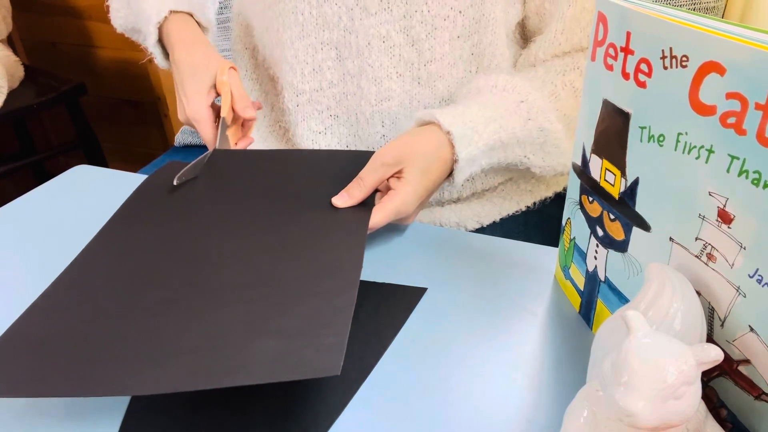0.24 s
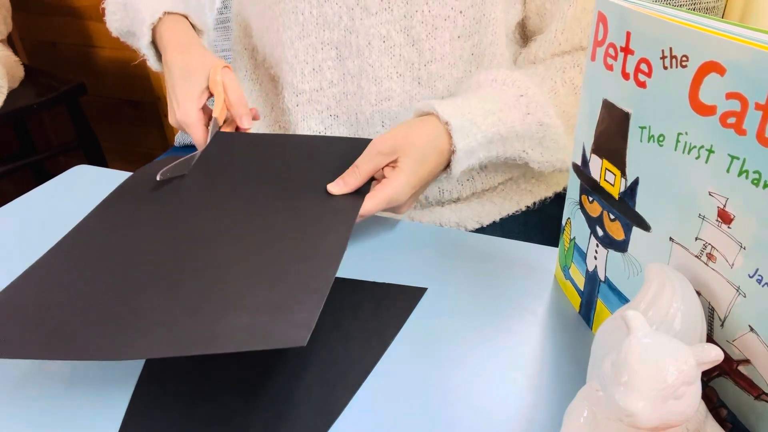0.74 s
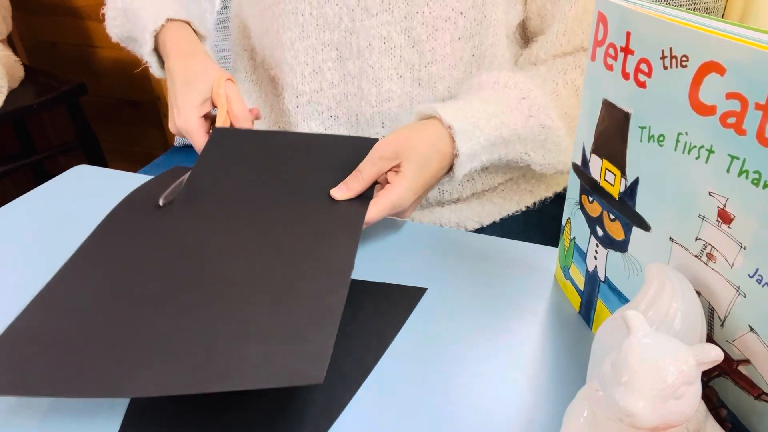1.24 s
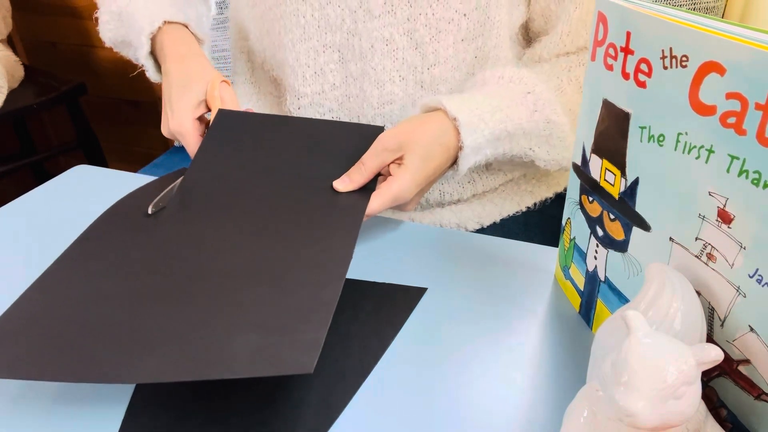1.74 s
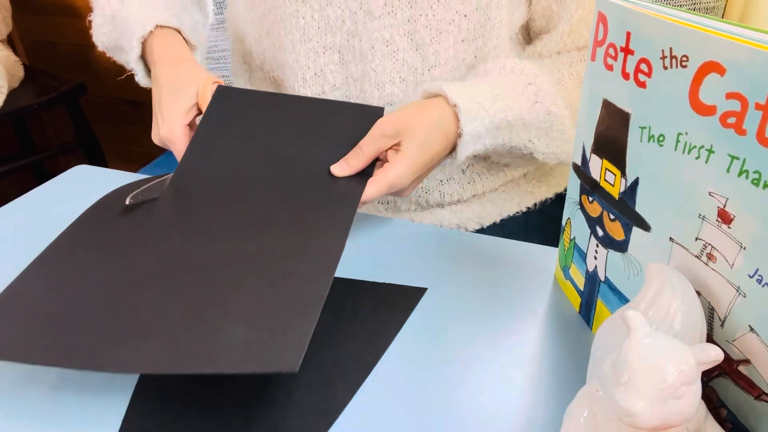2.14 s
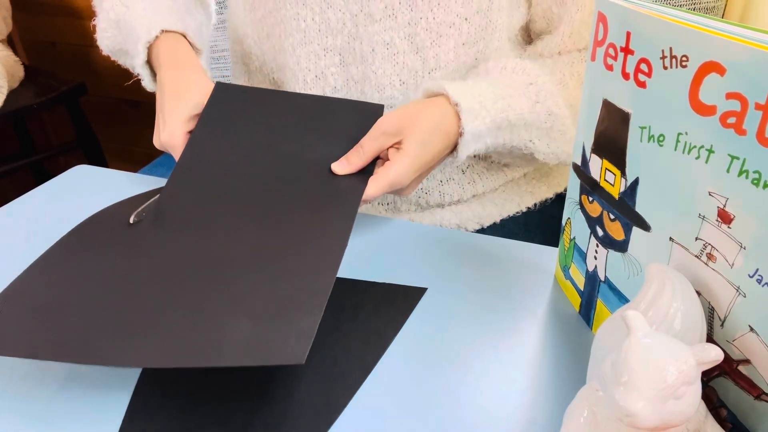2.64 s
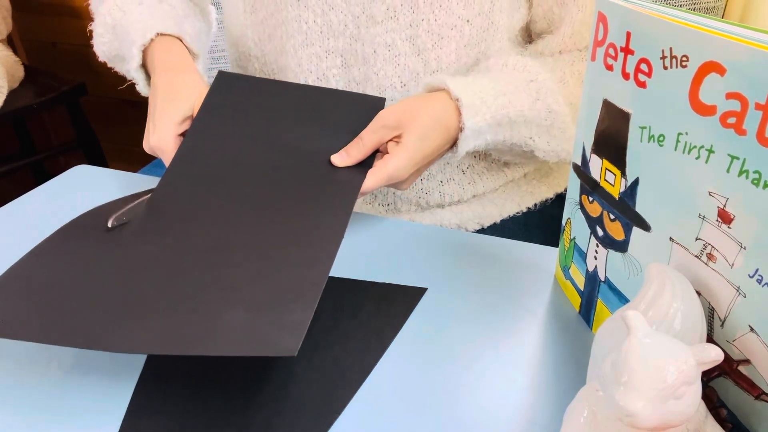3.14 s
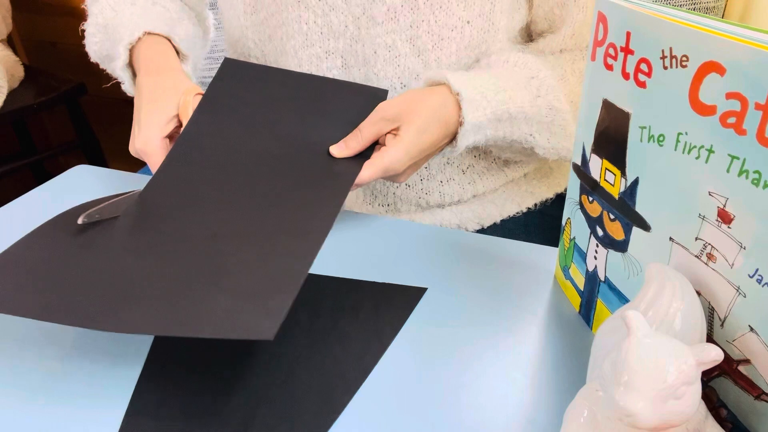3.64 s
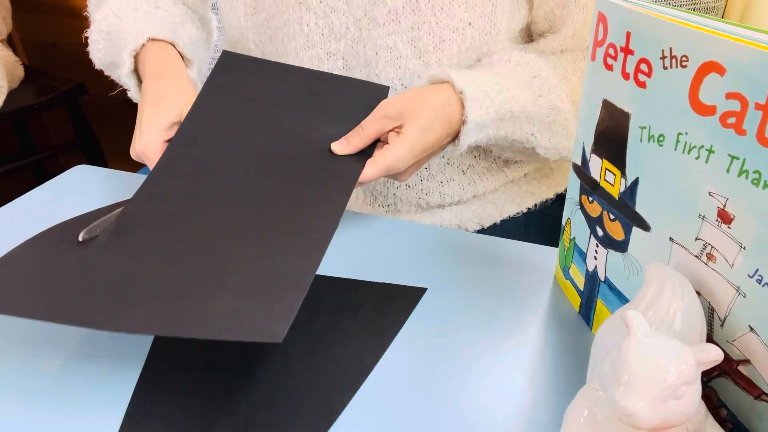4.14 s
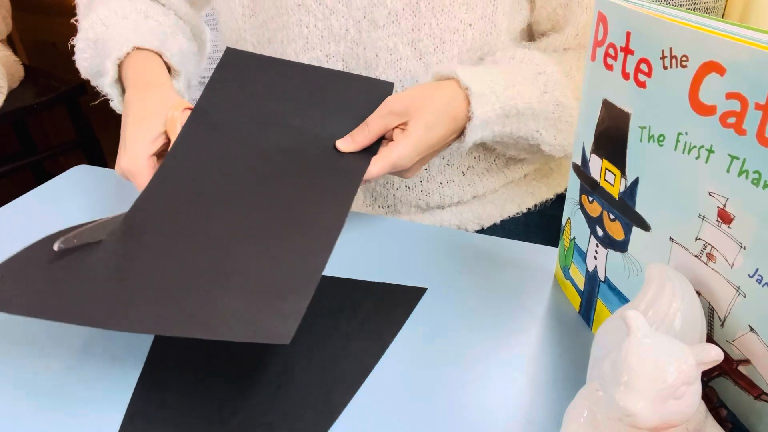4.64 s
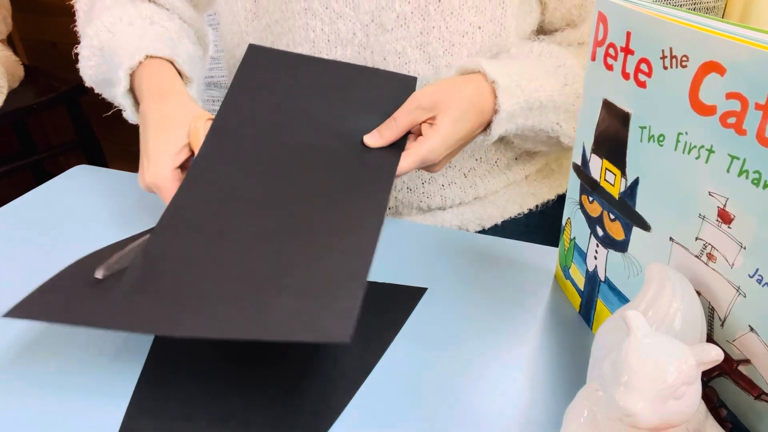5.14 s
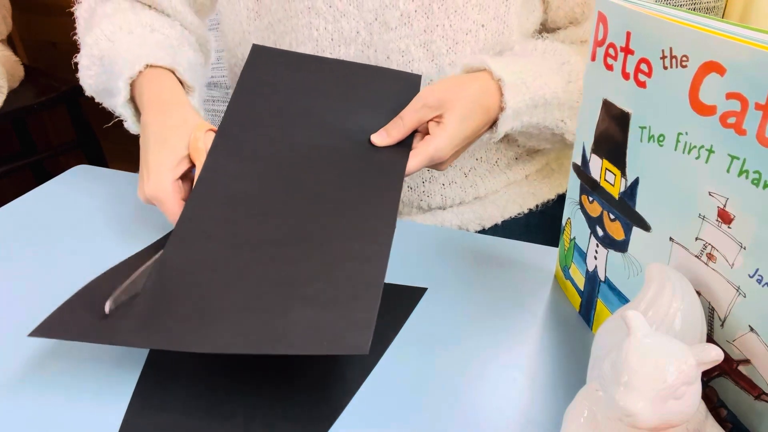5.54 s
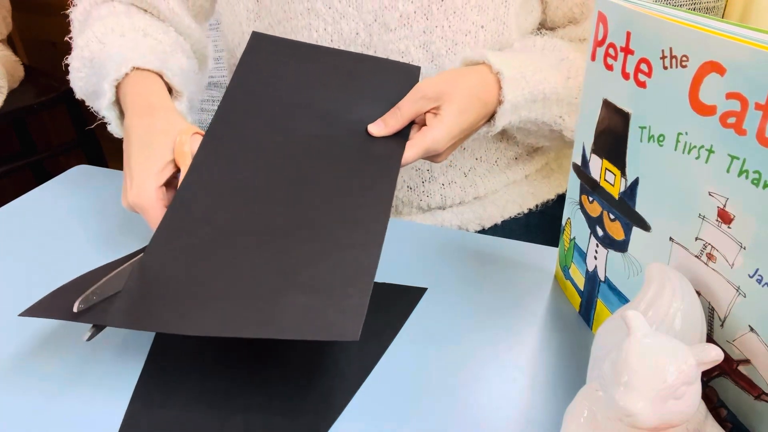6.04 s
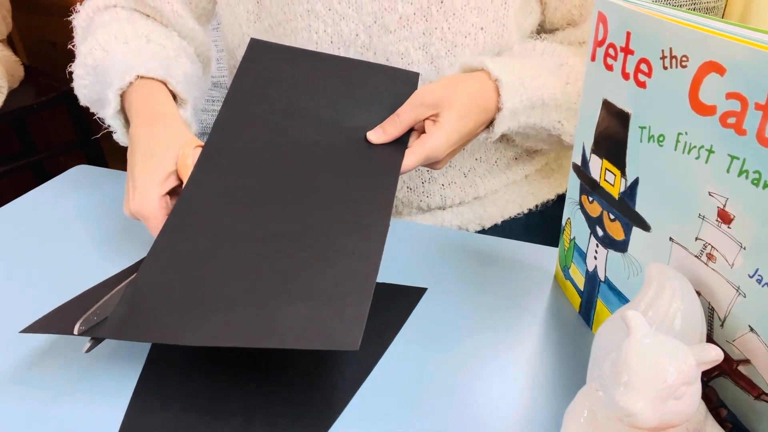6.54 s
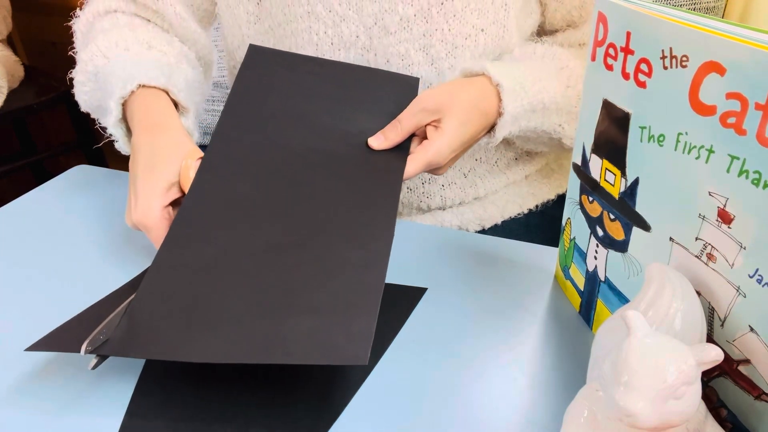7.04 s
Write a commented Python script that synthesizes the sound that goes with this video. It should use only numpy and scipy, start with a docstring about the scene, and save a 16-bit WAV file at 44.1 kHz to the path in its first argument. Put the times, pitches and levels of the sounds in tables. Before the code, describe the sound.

Close stereo microphones in a small quiet room catch scissors cutting stiff paper. Crunchy, crackling closing strokes come about every seven tenths of a second, each followed by a hissing, scraping slide as the blades reopen. The loose sheet rings and flexes softly, with a few tiny squeaks. Later bites are more hesitant, and a bright metallic snap ends the cut over low ventilation rumble.

```python
"""In a small quiet room, scissors cut a strip off a sheet of stiff craft paper held above a table.
Closing strokes tear fibres in runs of bites: grain bursts that crackle, crunch and ring the sheet; some squeak.
Openings rub the blades along the cut, as filtered slips; a sleeve brushes the sheet now and then.
At the end the blades break through the edge and snap shut with a sweep, a bounce and ringing modes.
Ventilation (shaped noise and hum) and a far engine's sinking drone (two sines) lie underneath."""
import sys
import numpy as np
from scipy import signal
from scipy.fft import rfft, irfft, next_fast_len
from scipy.io import wavfile

SR = 44100
rng = np.random.default_rng(int(sys.argv[2]) if len(sys.argv) > 2 else 0)


def pcm_store(signal):
    """Save signal as 16-bit PCM."""
    levels = np.round(np.clip(np.atleast_2d(signal), -1, 1) * 32767)
    wavfile.write(sys.argv[1], SR, levels.astype(np.int16).T)


N = 322371
T = np.arange(N) / SR
PADDED = next_fast_len(N + SR // 10)
BINS_HZ = np.fft.rfftfreq(PADDED, 1 / SR)

# Levels in the tables are in dB; most layers add a trim of their own.
# ventilation rumble: f/Hz, level/dB
AIR_SPECTRUM = [(20, -45), (35, -7.5), (50, 0), (95, 6.5), (130, -0.5), (190, -1), (260, -10.5),
                (330, -17.5), (430, -29), (800, -41), (1500, -44.5), (3000, -41), (6000, -50.5),
                (12000, -54), (16000, -79.5)]
# extra level of the rumble that differs left and right: f/Hz, level/dB
AIR_APART = [(50, -1.5), (150, 5.0), (300, 17.5), (1000, 26.0), (16000, 14.5)]
# ventilation hum: f/Hz, level/dB, waver/dB
HUM_TONES = [(48.6, -71.5, 3.5), (119.1, -69.5, 1.5), (241.3, -64.5, 0.15)]
# far engine, slowly sinking in pitch: t/s, f/Hz, fundamental level/dB, octave level/dB
ENGINE_DRONE = [(0.0, 101, -70, -76), (0.4, 100.5, -75, -55), (0.9, 100, -78, -87), (1.55, 99, -52, -73.5),
                (2.0, 96.5, -64, -68), (2.4, 95, -56, -68), (2.9, 93.5, -59, -60), (3.45, 91.5, -61, -66.5),
                (4.2, 89, -74, -60), (5.0, 85.5, -62.5, -66.5), (7.3, 81, -68, -66.5)]

# bites of the blades: t/s, tearing time/s, sheet level/dB, sheet f/Hz, crunch level/dB, crackle level/dB
FIBRE_BITES = [(0.0345, 0.0025, -55, 1265, -56, -94), (0.152, 0.0047, -49, 1190, -46, -66),
               (0.1638, 0.0055, -52.5, 910, -58, -55), (0.211, 0.0035, -61, 1000.0, -57, -58),
               (0.2287, 0.003, -45, 1190.0, -48, -55), (0.2545, 0.0044, -47, 775, -44, -63),
               (0.2738, 0.0031, -44, 740, -43.5, -60), (0.3016, 0.0039, -45.5, 775, -47.5, -54),
               (0.3328, 0.0034, -39, 765, -42.5, -57), (0.3601, 0.0055, -45, 690.0, -49, -58.0),
               (0.3875, 0.0048, -39.5, 800, -41, -69), (0.5567, 0.002, -40.5, 1160, -43, -46.5),
               (0.658, 0.0015, -45, 1190, -45.5, -75), (0.8973, 0.0044, -55, 710, -55, -59),
               (0.9344, 0.0043, -40, 1230, -42.5, -58), (0.9567, 0.0066, -37.5, 1190, -47, -59),
               (0.9825, 0.0044, -42, 780, -43.5, -53), (1.016, 0.0054, -41, 1000.0, -45.5, -64),
               (1.0487, 0.003, -37, 935, -39.5, -60), (1.2867, 0.0011, -44, 1160, -46.5, -48),
               (1.5707, 0.0037, -46, 920, -57, -55), (1.5885, 0.0052, -39.5, 1180, -48, -51.5),
               (1.62, 0.0037, -39, 890, -50, -52), (1.6417, 0.0038, -39.5, 755, -49, -50.5),
               (1.6541, 0.0036, -45, 700.0, -54, -51.5), (1.6709, 0.004, -38, 726, -47.5, -66),
               (1.699, 0.0036, -40, 846, -43.5, -63), (1.7122, 0.0041, -42.5, 700, -54, -55.5),
               (1.7592, 0.0032, -33.5, 906, -40.5, -51), (1.8244, 0.0047, -42, 730, -50.5, -63),
               (2.2841, 0.0045, -48.5, 1180, -60, -66), (2.294, 0.0052, -41.5, 1170, -48, -54),
               (2.3135, 0.0024, -39, 786, -52, -59.0), (2.3325, 0.0034, -39, 1210, -46, -54),
               (2.3497, 0.0036, -39.5, 816, -50, -63), (2.3655, 0.004, -41, 805, -46, -57.5),
               (2.3968, 0.003, -37, 890, -49, -59), (2.405, 0.0032, -38, 910, -45, -61),
               (2.4249, 0.0055, -38.5, 930.0, -50, -63.5), (2.435, 0.0037, -41.5, 920.0, -54.5, -64),
               (2.4549, 0.0039, -37.5, 1200, -44, -55), (2.4849, 0.0035, -37.5, 780, -45.5, -64),
               (2.6005, 0.0028, -54.5, 690, -49, -61), (2.6614, 0.0057, -45.5, 1030, -60.5, -75),
               (2.699, 0.003, -43.5, 1000, -42, -52), (2.843, 0.003, -55, 1200, -54.5, -67),
               (2.8722, 0.0042, -53.5, 1190, -48.5, -56.5), (2.9006, 0.0048, -52.5, 720, -49.5, -70.5),
               (2.991, 0.0025, -52.5, 786, -57, -64.5), (3.0375, 0.004, -38.0, 770.0, -42.5, -49),
               (3.0598, 0.0034, -39, 1040, -44.5, -56), (3.1285, 0.004, -36.5, 780.0, -41.5, -52),
               (3.16, 0.003, -43.5, 810, -43, -54), (3.243, 0.002, -46, 910, -49, -59),
               (3.2598, 0.004, -36.5, 727, -37.5, -50), (3.2818, 0.0036, -40.5, 704, -47, -59),
               (3.3041, 0.0039, -43.5, 760, -47, -56), (3.636, 0.0038, -38, 675, -51.5, -69),
               (3.7392, 0.0042, -48.5, 860, -58.5, -96), (3.8408, 0.0058, -50.5, 780, -54.5, -60.5),
               (3.9143, 0.0049, -48.5, 790, -55, -58.5), (3.9884, 0.0046, -39.5, 746, -46, -50),
               (4.0124, 0.0045, -47.5, 790, -54.5, -55), (4.0599, 0.0044, -37, 705, -39.5, -48.5),
               (4.1056, 0.0029, -40, 815, -40, -46.5), (4.1379, 0.0033, -47.5, 790.0, -41.5, -58),
               (4.171, 0.0029, -54, 770, -50.5, -61), (4.374, 0.0011, -37, 1210, -52, -46),
               (4.438, 0.0058, -45, 557, -54.5, -48.5), (4.4887, 0.0014, -39, 580, -45, -55),
               (4.775, 0.0052, -41.5, 790, -38.5, -42.5), (4.7942, 0.0034, -38, 754, -40, -51),
               (4.8125, 0.0035, -48, 740, -45.5, -55.5), (4.8428, 0.0028, -42, 960, -44, -51),
               (4.8768, 0.0036, -44, 780, -46.5, -52), (4.9234, 0.0038, -43, 754, -42.5, -53),
               (5.2141, 0.0038, -44, 1010, -46.5, -55), (5.5093, 0.0027, -48.5, 710.0, -43.5, -53),
               (5.5352, 0.0046, -44, 760.0, -39, -46.5), (5.5557, 0.0029, -51, 710.0, -46.5, -55),
               (5.5806, 0.0052, -48, 704, -46, -52), (5.639, 0.0039, -45, 610, -43, -54.0),
               (5.6612, 0.0034, -46, 1360, -54.5, -64), (6.2223, 0.0062, -54, 1180.0, -54.5, -52),
               (6.2706, 0.0025, -62, 610.0, -57.5, -62), (6.3233, 0.0038, -43, 625, -47, -50.5),
               (6.4005, 0.0042, -45, 550, -48.5, -60), (6.49, 0.0043, -51.5, 780, -48, -53.5),
               (6.6244, 0.0039, -49, 910, -55, -58.5), (6.6594, 0.004, -51, 746, -51.5, -61),
               (6.7388, 0.0044, -55.5, 870, -73.5, -82.0), (7.2008, 0.0042, -52, 780.0, -47.5, -53),
               (7.228, 0.0032, -48, 815, -48, -50), (7.2493, 0.0035, -51, 1310.0, -40.5, -46)]
# crunch of the paper, moving in pitch as the cut travels across the sheet: t/s, f/Hz
CRUNCH_PATH = [(0.3, 2040), (1.0, 1830), (1.7, 2900), (2.4, 2660), (3.1, 2170), (4.1, 1840), (4.8, 1940),
               (5.6, 1650), (6.5, 1700)]
# body of the sheet: f/Hz, level/dB
SHEET_SPECTRUM = [(80, -12.5), (180, -10.5), (300, -6.5), (410, -16.5), (600, -2.5), (800, 2), (1250, 2),
                  (1600, -2.5), (2400, -17.5), (8000, -44)]
# crunch of the paper: f/Hz, level/dB
CRUNCH_SPECTRUM = [(500, -23.5), (1100, -6.5), (1450, 5), (1900, 7.5), (2400, -3), (3100, -3.5),
                   (4300, -5.5), (6000, -7), (8000, -19), (16000, -65)]
# crackle of the fibres: f/Hz, level/dB
CRACKLE_SPECTRUM = [(1000, -15), (2500, -0.5), (4000, 4), (6000, 6.5), (7500, -1.5), (10000, -4),
                    (11700, -4), (14500, 7), (16000, 3.5)]
# resonances of the bright tick where the blades cross: f/Hz, width/Hz, level/dB
TICK_MODES = [(2576, 270, 4.5), (3580, 620, -1), (4530, 440, -1), (5830, 380, -2)]
TICK_SHADE_DB_PER_S = 1.83  # the sheet hides the blades more and more as the cut advances
# closing strokes: start t/s, end t/s, shearing level between the bites/dB
CLOSING_STROKES = [(0.133, 0.41, -55), (0.858, 1.077, -54), (1.548, 1.841, -51), (2.273, 2.477, -49),
                   (3.02, 3.338, -51.5), (3.826, 3.938, -56), (3.977, 4.185, -49), (4.736, 4.904, -44),
                   (5.5, 5.678, -49.5), (6.196, 6.413, -59.5), (6.615, 6.762, -57.5), (7.188, 7.253, -50)]

# blades open and slide on along the cut:
# start t/s, push length/s, steel fade/(dB per s), steel hiss level/dB, paper scrape level/dB
OPENING_SLIDES = [(0.526, 0.14, 482, -42, -42), (1.216, 0.098, 228, -43, -39.5),
                  (1.936, 0.13, 308, -44.5, -39), (2.642, 0.049, 81, -42, -36.5),
                  (3.43, 0.14, 151, -46, -38), (4.321, 0.092, 106, -44.5, -41),
                  (5.077, 0.11, 188, -46.5, -43.5), (5.807, 0.11, 160, -45, -47)]
SLIDE_ATTACK_S, SLIDE_SAG_DB_PER_S = 0.03, 44.5
SCRAPE_FADE_SHARE = 0.68  # the paper dies away more slowly than the steel
# steel hiss: f/Hz, level/dB
HISS_SPECTRUM = [(800, -8), (1800, -1), (2800, 4), (3600, 7.5), (4700, 4), (6000, 0), (9000, -6),
                 (11700, -9), (13300, -7.5), (16000, -9)]
# paper scrape: f/Hz, level/dB
SCRAPE_SPECTRUM = [(200, -11), (400, -21.5), (600, -5.5), (720, 0.5), (1250, 1.5), (1900, 1.5),
                   (3000, -4.5), (6000, -17), (16000, -53.5)]
# ring of the free blades: f/Hz, level/dB, t60/s
BLADE_MODES = [(2570, 9, 0.03), (4480, -7, 0.03), (7200, 2, 0.019), (8680, -3, 0.11), (9900, 1, 0.1),
               (10100, -14, 0.062), (10300, -7, 0.031), (13400, -21, .05)]

# soft thumps of the flexing sheet: t/s, f/Hz, level/dB
SHEET_FLEXES = [(0.94, 170, -58.5), (1.019, 125, -53.5), (1.58, 122, -56), (4.41, 137, -62),
                (7.267, 97, -53), (7.267, 190, -52.5)]
# the cut edge sticks and slips on the blade: start t/s, end t/s, f at the middle/Hz, level/dB
EDGE_SQUEAKS = [(0.987, 1.008, 780, -46.5), (3.125, 3.146, 803, -35), (4.08, 4.097, 770.4, -41.5),
                (4.845, 4.866, 938, -44), (5.538, 5.576, 686, -41), (5.582, 5.597, 660, -43),
                (5.646, 5.659, 640, -44.5)]
SQUEAK_SAG_HZ_PER_S = 990
# sleeve brushing the sheet: start t/s, end t/s, level/dB
SLEEVE_BRUSHES = [(4.5, 4.777, -68.5), (5.204, 5.404, -72.5), (7.08, 7.15, -79)]
# wool on paper: f/Hz, level/dB
WOOL_SPECTRUM = [(500, 10), (2000, 0.5), (3300, -1), (4600, 8), (5700, 6.5), (8000, -18), (15000, -18.5)]

SNAP_S = 7.2684
# blades hitting their stop: f/Hz, level/dB
STEEL_SPECTRUM = [(500, -18), (2500, -4), (4500, 0), (5600, -3), (7200, 3), (8000, -6), (9700, 5.5),
                  (11500, -1), (13000, 4), (16000, 2)]
# thud of the snap: f/Hz, level/dB
THUD_SPECTRUM = [(40, 2), (90, 11), (170, -4), (330, -2), (450, -4), (650, 5), (1000, 4), (1600, -4),
                 (3000, -11.5), (8000, -40)]

# resonances of the space around the table: f/Hz, width/Hz, left level/dB, right level/dB
NOOK_MODES = [(557, 23, 2.5, 11), (719, 32, 2.5, 3), (776, 20.7, -10, 14), (838, 5.7, -14, -28),
              (914, 8.4, 12, 1.5), (1027, 14.6, 10, -17), (1214, 20, 8.5, 6.5), (1390, 30, -3, -9)]
# scatter off sheet and table: f/Hz, level/dB
SCATTER_SPECTRUM = [(500, -18), (1300, -10), (2600, 0), (6000, 1), (9000, -16), (16000, -20)]
# diffuse tail: f/Hz, level/dB
WALL_SPECTRUM = [(400, 5.5), (600, 9), (1200, 0), (2800, 1.5), (6000, -3.5), (9000, -2.0), (16000, -49.5)]
# treble tail: f/Hz, level/dB
TREBLE_SPECTRUM = [(2000, -41.5), (5000, -9.0), (9000, 4.0), (16000, -12.5)]
PORT_LAG_S = 0.0001
# how much louder the right microphone hears the scene: f/Hz, level/dB
RIGHT_LEAN = [(50, 5), (130, 4), (250, 11), (450, 3), (780, 1), (1100, 0.5), (2000, 1), (2800, 2),
              (5500, 5), (8000, 0.5), (10000, 0)]
TOP_HZ, OVERLOAD = 16000, 0.9  # upper edge of the band; ceiling of the soft overload


def amp(db):
    """Decibels to gain."""
    return 10 ** (np.asarray(db) / 20)


def unit(x):
    """Scale to rms 1."""
    return x / np.sqrt(np.mean(x ** 2) + 1e-20)


def add(track, s, x):
    """Mix a sound into a track at a time in seconds."""
    i = int(s * SR)
    track[i:i + len(x)] += x[:N - i]


def colour(x, points):
    """Causal filter through (Hz, dB) points, built by folding the cepstrum to minimum phase."""
    hz, db = np.transpose(points)
    size = 4096
    f = np.maximum(np.fft.rfftfreq(size, 1 / SR), 1)
    cepstrum = irfft(np.log(amp(np.interp(np.log(f), np.log(hz), db))))
    cepstrum[1:size // 2] *= 2
    cepstrum[size // 2 + 1:] = 0
    impulse = irfft(np.exp(rfft(cepstrum)))
    return signal.fftconvolve(x, impulse)[:len(x)]


def resonate(x, hz, t60):
    """One decaying mode, whose pitch may move from sample to sample."""
    turn = np.exp(2j * np.pi * np.cumsum(hz * np.ones(len(x))) / SR)
    pole = np.exp(-np.log(1000) / (t60 * SR))
    return np.real(signal.lfilter([2 * (1 - pole)], [1, -pole], x / turn) * turn)


def ring_time(width_hz):
    """A narrower resonance rings longer: t60 from its width."""
    return np.log(1000) / (np.pi * width_hz)


def walk(rate):
    """Slow chance with a spread near 1, drawn rate times a second and joined by straight lines."""
    knots = np.arange(0, T[-1] + 1, 1 / rate)
    return np.interp(T, knots, rng.standard_normal(len(knots)))


def grains(n, rate, spread_db):
    """Tiny fractures of uneven size at random moments."""
    struck = rng.random(n) < rate / SR
    return struck * rng.choice([-1, 1], n) * amp(spread_db * rng.standard_normal(n))


def swell(t, peak_s, steep=2):
    """A push that builds up to peak_s and dies away."""
    return (t / peak_s * np.exp(1 - t / peak_s)) ** steep


def gate(start, end, ramp_s):
    """Rise, hold and fall of a steady push."""
    return np.clip(np.minimum(T - start, end - T) / ramp_s + .5, 0, 1) ** 2


def ventilation(air_db=-57.5, spread_db=-12):
    """Moving air: low rumble with a wavering hum and a faint hiss, partly different left and right."""
    rumble = amp(air_db) * unit(colour(rng.standard_normal(N), AIR_SPECTRUM))
    hum = np.zeros(N)
    for hz, db, waver_db in HUM_TONES:
        level = amp(db + waver_db * walk(7.6))
        hum += level * unit(np.sin(2 * np.pi * hz * T + 0.13 * waver_db * walk(8)))
    diffuse = np.array([colour(unit(colour(rng.standard_normal(N), AIR_SPECTRUM)), AIR_APART)
                        for _ in range(2)])
    return rumble + hum + amp(air_db + spread_db) * diffuse


def drone(waver_db=3.0, drift=0.00795):
    """A far engine, heard through the walls as a low tone and its octave."""
    times, hz, *levels = np.transpose(ENGINE_DRONE)
    phase = 2 * np.pi * np.cumsum(np.interp(T, times, hz) * (1 + drift * walk(10))) / SR
    out = np.zeros(N)
    for harmonic, db in enumerate(levels, 1):
        level = amp(np.interp(T, times, db) + waver_db * walk(8))
        out += level * unit(np.sin(harmonic * phase))
    return out


def flavour(x, spread_db):
    """The spot where the paper gives way favours some frequencies by chance."""
    hz = np.geomspace(400, 8000, num=12)
    return colour(x, np.transpose([hz, spread_db * rng.standard_normal(len(hz))]))


def bites(body_db=-13, ring_db=-16.5, crunch_db=-11.5, crackle_db=-7.5, tick_db=-13, straggle=0.19):
    """Bundles of fibres give way: they crackle, paper crunches, blades tick, the sheet rings briefly."""
    out, t = np.zeros(N), T[:SR // 10]
    ring_t60, sag, sag_s = .022, .17, .014
    flavour_db, crunch_t60, steep = 2.5, .005, 4
    for s, tear_s, sheet_db, hz, paper_db, fibre_db in FIBRE_BITES:
        # the main break is followed by a ragged tail of straggling fibres
        rise_s = np.sqrt(steep / 2) * tear_s
        breaking = swell(t, rise_s, steep) + straggle * swell(t, peak_s=0.013)
        tear = grains(len(t), rate=9000, spread_db=3) * breaking
        fibres = grains(len(t), rate=7000, spread_db=4.5) * breaking

        # short bending waves cross the sheet faster than long ones, so the ring falls in pitch
        pitch = hz * (1 + sag * (np.exp(-t / sag_s) - .5))
        body = amp(body_db) * unit(colour(flavour(tear, flavour_db / 2), SHEET_SPECTRUM))
        sheet = body + amp(ring_db) * unit(resonate(tear, pitch, ring_t60))

        crunch_hz = np.interp(s, *np.transpose(CRUNCH_PATH))
        paper = unit(colour(flavour(fibres, flavour_db), CRUNCH_SPECTRUM))
        paper += amp(-7) * unit(resonate(fibres, crunch_hz, crunch_t60))
        crackle = amp(fibre_db + crackle_db) * unit(colour(fibres, CRACKLE_SPECTRUM))

        steel = np.zeros(len(t))
        for mode_hz, width, db in TICK_MODES:
            level = amp(db + flavour_db * rng.standard_normal())
            steel += level * resonate(fibres, mode_hz, ring_time(width))
        tick = amp(paper_db + tick_db - TICK_SHADE_DB_PER_S * s) * unit(steel)

        bite = amp(sheet_db) * sheet + amp(paper_db + crunch_db) * unit(paper) + tick + crackle
        add(out, s - rise_s, bite)  # the main break peaks at s
    return out


def shearing(body_db=-4, crunch_db=-5, crackle_db=-11, patchy_db=4, ramp_s=0.017):
    """Single fibres and small bundles part all through each closing stroke."""
    force = sum(amp(db) * gate(start, end, ramp_s) for start, end, db in CLOSING_STROKES)
    fibres = grains(N, rate=750, spread_db=2.5) * amp(patchy_db * walk(120))
    body = amp(body_db) * unit(colour(fibres, SHEET_SPECTRUM))
    crunch = amp(crunch_db) * unit(colour(fibres, CRUNCH_SPECTRUM))
    crackle = amp(crackle_db) * unit(colour(fibres, CRACKLE_SPECTRUM))
    return force * (body + crunch + crackle)


def glide(start, push_s, fade_db_per_s):
    """A slide sets in quickly, sags a little during the push and then fades faster."""
    t = np.maximum(T - start, 0)
    attack = np.minimum(t / SLIDE_ATTACK_S, 1) ** 2
    return attack * amp(-SLIDE_SAG_DB_PER_S * t - fade_db_per_s * np.maximum(t - push_s, 0))


def sliding(hiss_db=-2.0, scrape_db=-5.5, rough_db=1.5):
    """Steel rubs on steel with a fine ringing hiss while the cut edge scrapes along the blade."""
    hiss, scrape = np.zeros(N), np.zeros(N)
    for start, push_s, fade, steel_db, paper_db in OPENING_SLIDES:
        hiss += amp(steel_db) * glide(start, push_s, fade)
        scrape += amp(paper_db) * glide(start, push_s, SCRAPE_FADE_SHARE * fade)
    slips = grains(N, rate=7000, spread_db=3.5) * amp(rough_db * walk(200))
    damping, ring_db = .2, -13  # the contact shortens the ring of the blades
    ring = sum(amp(db) * resonate(slips, hz, damping * t60) for hz, db, t60 in BLADE_MODES)
    blades = unit(colour(slips, HISS_SPECTRUM)) + amp(ring_db) * unit(ring)
    paper = unit(colour(slips, SCRAPE_SPECTRUM))
    return hiss * amp(hiss_db) * blades + scrape * amp(scrape_db) * paper


def flexing(peak_s=0.019, t60=.07):
    """The big loose sheet buckles softly in the hand, and again when the strip comes free."""
    out, t = np.zeros(N), T[:SR // 5]
    for s, hz, db in SHEET_FLEXES:
        push = rng.standard_normal(len(t)) * swell(t, peak_s)
        thump = resonate(resonate(push, hz, t60 / 2), hz, t60)
        add(out, s, amp(db) * unit(thump))
    return out


def squeaks(db=-1.5, ramp_s=0.0073, jitter=0.0203, overtone_db=-17):
    """The edge catches on the blade and drives the sheet at one slightly falling, jittery pitch."""
    out, wobble = np.zeros(N), 1 + jitter * walk(250)
    for start, end, hz, level in EDGE_SQUEAKS:
        pitch = hz - SQUEAK_SAG_HZ_PER_S * (T - (start + end) / 2)
        phase = 2 * np.pi * np.cumsum(wobble * pitch) / SR
        tone = np.sin(phase) + amp(overtone_db) * np.sin(2 * phase)
        out += amp(level + db) * gate(start, end, ramp_s) * tone
    return np.sqrt(2) * out * amp(1.7 * walk(150))


def sleeve(db=-2, ramp_s=0.067):
    """Wool brushes faintly on the sheet, as soft filtered noise."""
    touch = sum(amp(level + db) * gate(start, end, ramp_s) for start, end, level in SLEEVE_BRUSHES)
    return touch * unit(colour(rng.standard_normal(N), WOOL_SPECTRUM))


def snap(click_db=-28, ring_db=-42, thud_db=-41.5, nick_db=-43, rattle_db=-41,
         bounce_s=0.0128, bounce_db=-12, spread_s=0.001807):
    """The last fibres part, then the blades hit their stop, thud, rattle, ring and bounce once."""
    out, t = np.zeros(N), T[:SR // 10]
    # high bending waves run along the blades faster than low ones,
    # so the blow arrives as a very short downward sweep
    blow = np.sin(np.pi * TOP_HZ * spread_s * np.maximum(1 - t / spread_s, 0) ** 2)
    click = amp(click_db) * unit(colour(blow, STEEL_SPECTRUM))
    chatter = grains(len(t), rate=5000, spread_db=4) * swell(t, peak_s=.012)
    rattle = amp(rattle_db) * unit(colour(chatter, STEEL_SPECTRUM))
    modes = sum(amp(db - 60 * t / t60) * np.sin(2 * np.pi * hz * t) for hz, db, t60 in BLADE_MODES)
    ring = amp(ring_db) * unit(modes)
    push = rng.standard_normal(len(t)) * swell(t, peak_s=0.012)
    thud = amp(thud_db) * unit(colour(push, THUD_SPECTRUM))
    parting = rng.standard_normal(len(t)) * swell(t, peak_s=0.0012)
    nick = amp(nick_db) * unit(resonate(parting, 2250, t60=0.0037))
    add(out, SNAP_S - .003, nick)
    add(out, SNAP_S, click + ring + thud + rattle)
    add(out, SNAP_S + bounce_s, amp(bounce_db) * click)
    return out


def ports(x):
    """The sound reaches the left microphone a moment before the right."""
    late = irfft(rfft(x, PADDED) * np.exp(-2j * np.pi * BINS_HZ * PORT_LAG_S), PADDED)[:N]
    return np.array([x, late])


def echoes(x, t60, onset_s):
    """Dense reflections that set in softly and die away, at unit energy."""
    t = T[:SR // 3]
    decay = amp(-60 * t / t60) * np.clip(t / onset_s, 0, 1)
    tail = rng.standard_normal(len(t)) * decay / np.sqrt(np.sum(decay ** 2))
    return signal.fftconvolve(x, tail)[:N]


def shifting_echoes(x, t60, onset_s, count):
    """Reflections that change slowly as the sheet and the scissors move."""
    weights = np.array([walk(rate=4) for _ in range(count)])
    weights /= np.sqrt(np.sum(weights ** 2, axis=0))
    return sum(weight * echoes(x, t60, onset_s) for weight in weights)


def room(x, t60=0.19, wet_db=-5, treble_db=-7, nook_db=-4, table_db=-5):
    """Quick scatter off sheet and table, then a short tail: diffuse in the middle, alike in the treble."""
    scatter = colour(x, SCATTER_SPECTRUM)
    diffuse = colour(x, WALL_SPECTRUM)
    bright = colour(x, TREBLE_SPECTRUM)
    table = np.array([shifting_echoes(scatter, t60=0.014, onset_s=0.00031, count=4) for _ in range(2)])
    walls = np.array([shifting_echoes(diffuse, t60, onset_s=0.0083, count=4) for _ in range(2)])
    nook = sum(amp([[left], [right]]) * resonate(x, hz, ring_time(width))
               for hz, width, left, right in NOOK_MODES)
    treble = ports(echoes(bright, t60, onset_s=0.0056))
    return amp(table_db) * table + amp(wet_db) * walls + amp(nook_db) * nook + amp(treble_db) * treble


def scene():
    """Scissors and paper in front of the microphones, the room around them."""
    near = bites() + shearing() + sliding() + squeaks() + sleeve() + snap()
    return ports(near + flexing()) + room(near) + ventilation() + drone()


def record(dry):
    """The two microphones differ in colour; soft overload rounds peaks and a steep filter cuts the top."""
    hz, db = np.transpose(RIGHT_LEAN)
    lean = np.interp(np.log(np.maximum(BINS_HZ, 1)), np.log(hz), db)
    sides = amp(np.array([-lean, lean]) / 2)
    heard = irfft(rfft(dry, PADDED) * sides, PADDED)[:, :N]
    rounded = OVERLOAD * np.tanh(heard / OVERLOAD)
    return signal.sosfilt(signal.ellip(8, .2, 70, TOP_HZ, fs=SR, output="sos"), rounded)


dry = scene()
out = record(dry)
pcm_store(out)
```